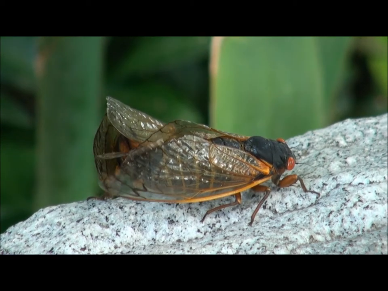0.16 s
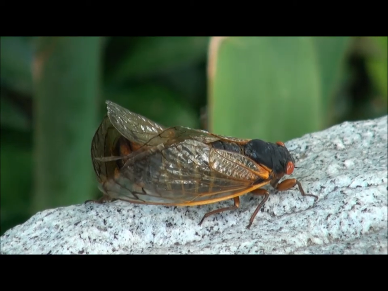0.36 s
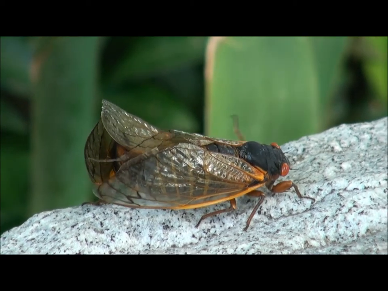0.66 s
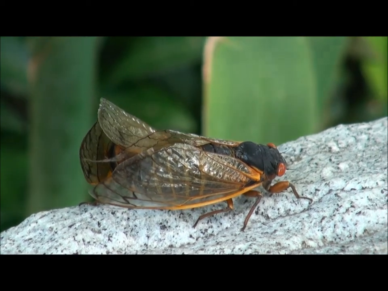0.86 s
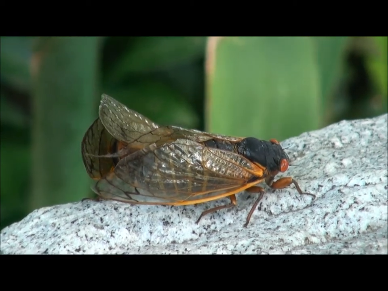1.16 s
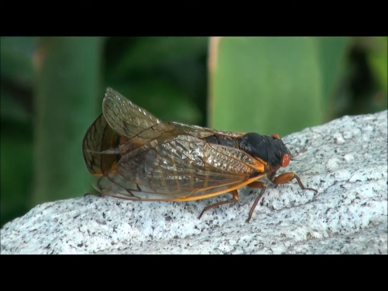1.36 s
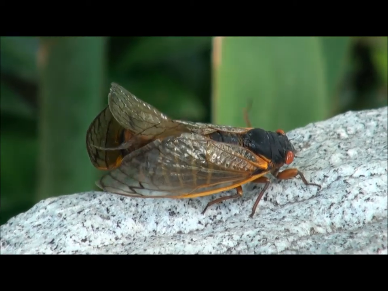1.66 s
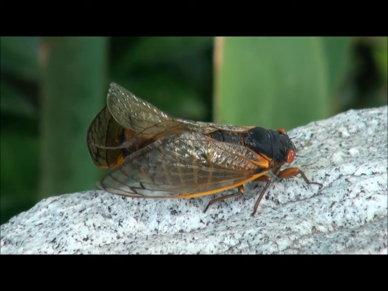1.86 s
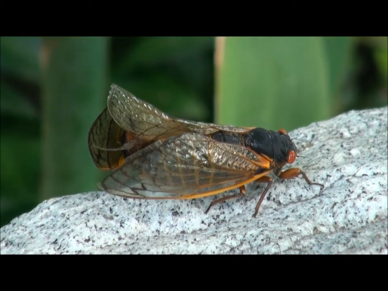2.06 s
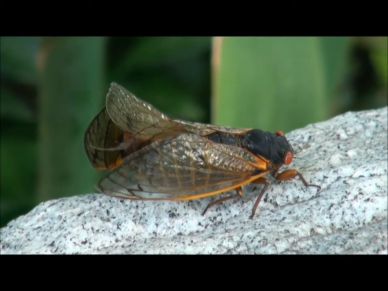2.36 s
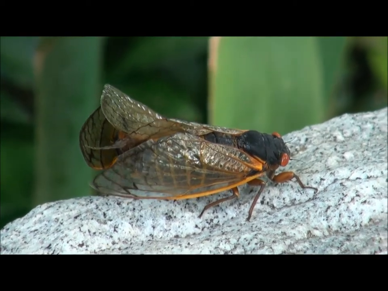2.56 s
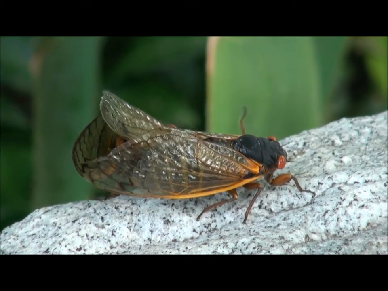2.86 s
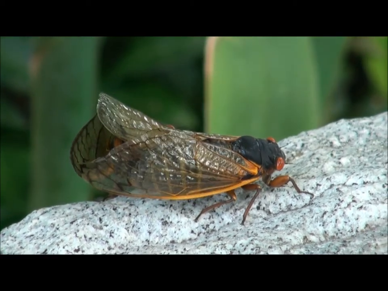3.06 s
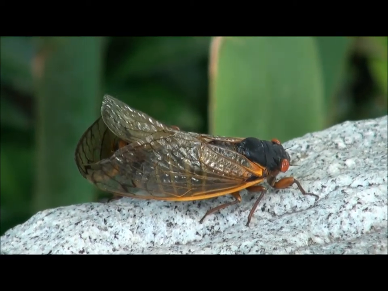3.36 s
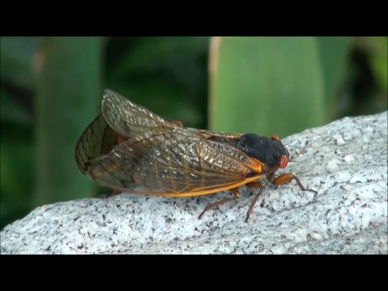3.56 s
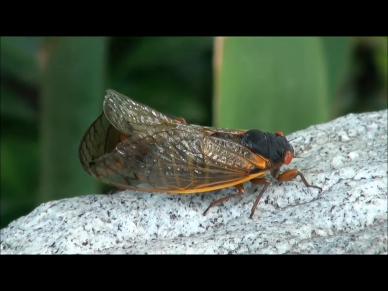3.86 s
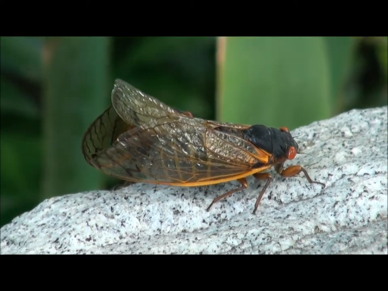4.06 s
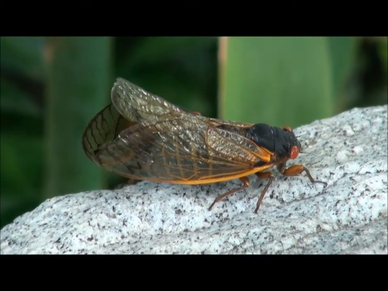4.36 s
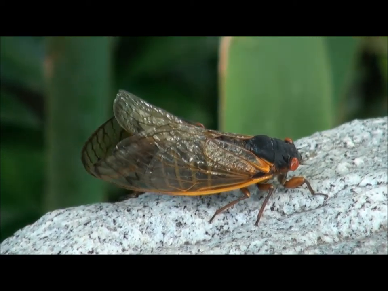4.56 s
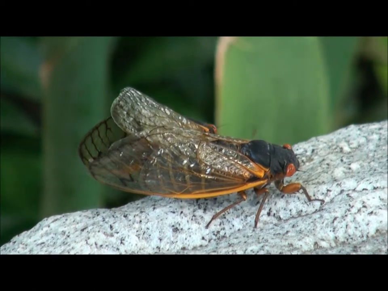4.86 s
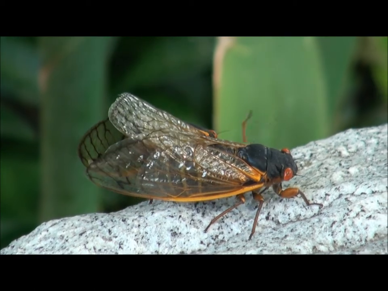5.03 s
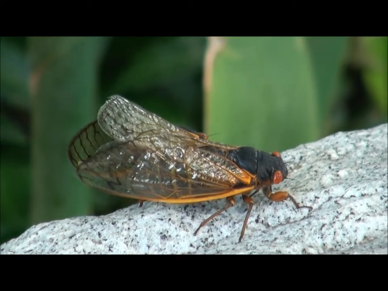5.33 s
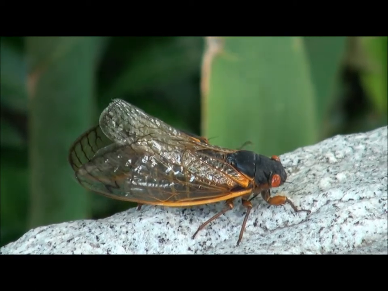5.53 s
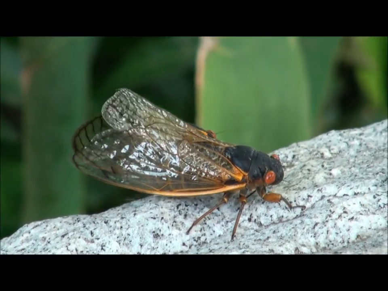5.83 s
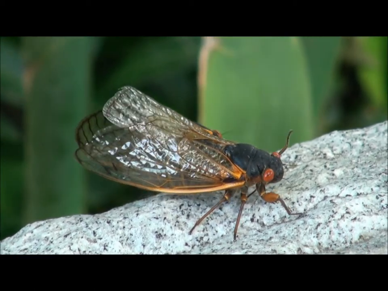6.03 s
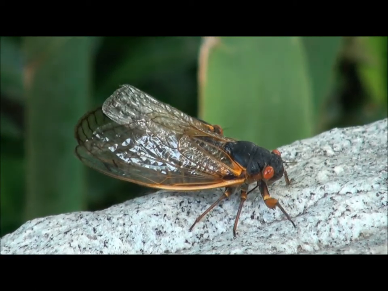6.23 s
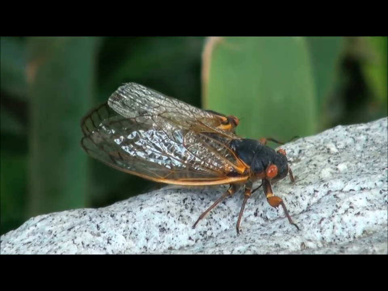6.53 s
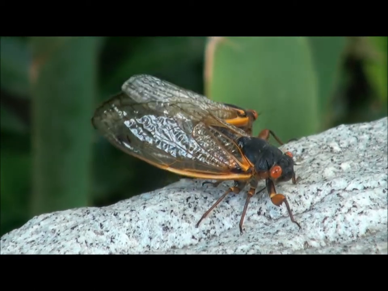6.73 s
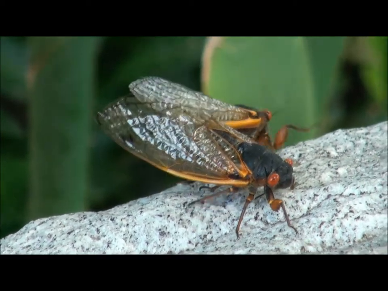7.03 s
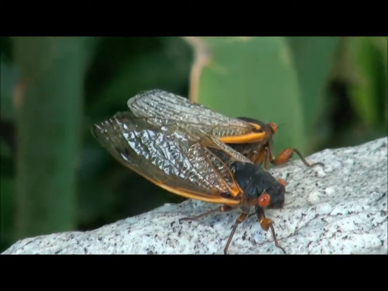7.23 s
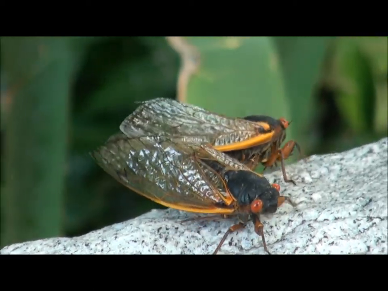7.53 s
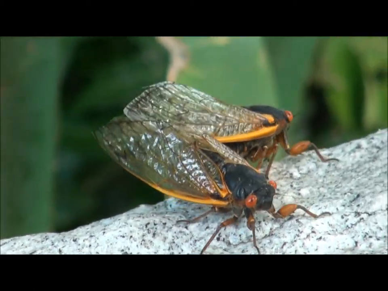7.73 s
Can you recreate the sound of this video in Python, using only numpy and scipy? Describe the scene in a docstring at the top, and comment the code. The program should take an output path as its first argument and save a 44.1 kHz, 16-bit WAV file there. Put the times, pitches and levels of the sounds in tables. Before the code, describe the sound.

Wide, natural outdoor ambience: cicadas merge into a smooth whistling hum that gently swells and eases, never stopping. Faint road rumble, tyre wash and beating engine tones sit far beneath it. A slight high rasp colours the opening and fades. Near the microphone, a single insect's stiff wings rattle for a fraction of a second a little before the middle, then only chorus and distant traffic remain.

```python
"""Periodical cicadas in chorus beside distant traffic

Forty cicadas sing wavering notes in ten trees; with a noise band for the far crowd they drone near 1.3 kHz.
A thin hiss of shaped noise stands above them and swells with the song.
Distant engines, built from drifting sines, hum and beat under a road of low rumble and tyre wash.
One cicada on a stone by the microphone flicks its wings: short bursts of filtered noise.
A faint high sine whines throughout, and a narrow band of noise rasps at the start."""
import sys
import numpy as np
from scipy import signal
from scipy.fft import rfft, irfft, next_fast_len
from scipy.io import wavfile
from scipy.ndimage import map_coordinates

SR = 44100
rng = np.random.default_rng(int(sys.argv[2]) if len(sys.argv) > 2 else 0)


def waveform_to_disk(signal):
    """Save audio, clipped to [-1, 1], as 16-bit WAV at the path in sys.argv[1]."""
    frames = np.transpose(np.atleast_2d(signal))
    scaled = np.clip(frames, -1, 1) * 32767
    samples = np.round(scaled).astype(np.int16)
    wavfile.write(sys.argv[1], SR, samples)


N = 347949
CLOCK = np.arange(N) / SR  # time of each sample [s]

# the chorus swells and eases as a whole: (time [s], level [dB])
CHORUS_LEVEL = [(0, -23.5), (0.85, -23.0), (1.6, -24.5), (2.55, -23.0), (2.85, -25.5), (3.7, -23.0),
                (5.05, -22), (6.3, -23.0), (6.8, -23.5), (7.89, -22.5)]


def amp(db):
    """Decibels to gain."""
    return 10 ** (np.asarray(db) / 20)


def unit(x):
    """Scale to rms 1."""
    return x / np.sqrt(np.mean(x ** 2) + 1e-20)


def along(points, hz):
    """Join (frequency [Hz], value) points on a log frequency axis."""
    f, v = np.transpose(points)
    return np.interp(np.log(hz + 1), np.log(f + 1), v)


def curves(rows):
    """One value per sample for each column after the time."""
    s, *columns = np.transpose(rows)
    return [np.interp(CLOCK, s, column) for column in columns]


def wobble(rate, t):
    """A smooth random curve at times t, with rate knots a second."""
    knots = rng.standard_normal(int(t[-1] * rate) + 4)
    return map_coordinates(knots, [t * rate])


def swell(t, s, rise_s, fall_s):
    """A bell-shaped gain that peaks at time s; rise and fall are standard deviations."""
    width_s = np.where(t < s, rise_s, fall_s)
    return np.exp(-.5 * ((t - s) / width_s) ** 2)


def tone(hz):
    """A sine that follows a pitch curve from a random phase."""
    cycles = np.cumsum(hz) / SR
    return np.sin(2 * np.pi * (cycles + rng.random()))


def filtered(x, response):
    """Multiply the spectrum of x by a response of frequency."""
    m = next_fast_len(N + SR // 2)
    gain = response(np.fft.rfftfreq(m, 1 / SR))
    return irfft(rfft(x, m) * gain, m)[..., :N]


def spread(pair, pan_db):
    """Two unrelated signals become a diffuse field at closely spaced microphones, rms 1."""
    # likeness of left and right: (frequency [Hz], coherence [0 to 1])
    coherence = [(30, 0.84), (80, 0.97), (180, 0.99), (330, 0.88), (700, .83), (1300, 0.83), (5000, 0.91),
                 (9000, 0.93), (11000, 0.71), (11600, .995)]

    def mid_side(hz):
        angle = np.arccos(np.clip(along(coherence, hz), -1, 1)) / 2
        return np.array([np.cos(angle), np.sin(angle)])

    mid, side = filtered(pair, mid_side)
    pan = amp([[pan_db / 2], [-pan_db / 2]])
    return unit(np.array([mid + side, mid - side]) * pan)


def rush(spectrum, pan_db):
    """Diffuse coloured noise of rms 1."""
    noise = rng.standard_normal((2, N))
    return spread(filtered(noise, lambda hz: amp(along(spectrum, hz))), pan_db)


def whine(hz=3016, level_db=-63, drift_hz=4):
    """A faint, nearly steady high sine."""
    return amp(level_db) * unit(tone(hz + drift_hz * wobble(15, CLOCK)))


def rasp(level_db=-52, loudest_s=.2, half_s=0.54):
    """A narrow, bright band of noise swells at once and dies away within two seconds."""
    # relative spectrum: (frequency [Hz], density [dB per Hz])
    spectrum = [(3000, -30), (4100, -4), (4600, 0), (5100, -10), (6000, -30)]
    return amp(level_db) * swell(CLOCK, loudest_s, half_s, half_s) * rush(spectrum, pan_db=.5)


def road(screened_s=0.11):
    """Far traffic: a low rumble and the wash of tyres; each passing vehicle adds its power to both."""
    # relative spectra: (frequency [Hz], density [dB per Hz])
    rumble_spectrum = [(20, -17), (35, -8), (53, -2.5), (66, -5), (95, -1), (150, 0.5), (200, -0.5),
                       (255, -5.5), (350, 0), (430, -7.5), (540, -14), (900, -13.5), (2000, -58)]
    tyre_spectrum = [(150, -14), (500, -0.5), (900, 4.5), (1900, -0.5), (2550, 0.5), (3200, -5),
                     (4700, -6.5), (6200, -12), (8000, -17.5), (15000, -39)]
    # vehicles that swell and are soon screened again:
    # (loudest at [s], approach [s], rumble level [dB], tyre level [dB])
    passes = [(.05, .4, -35.5, -40), (1.25, 1, -38.5, -41), (2.55, .45, -38, -43), (5.05, 0.47, -50, -43)]
    # the steady traffic slowly thins out: dB at the start, less dB per second
    rumble = amp(-37 - .55 * CLOCK)
    tyres = amp(-39 - .5 * CLOCK)
    for s, approach_s, rumble_db, tyre_db in passes:
        nearness = swell(CLOCK, s, approach_s, screened_s)
        rumble = np.hypot(rumble, amp(rumble_db) * nearness)
        tyres = np.hypot(tyres, amp(tyre_db) * nearness)
    return rumble * rush(rumble_spectrum, pan_db=1.5) + tyres * rush(tyre_spectrum, pan_db=1.0)


def far_notes(drift_hz=3, waver_db=1.5, pan_db=4.5):
    """Notes of farther engines swell and fade, unsteady in pitch and level."""
    # (loudest at [s], standard deviation of the swell [s], pitch [Hz], level before panning [dB])
    hums = [(.8, 0.99, 341.4, -43.5), (1.18, 0.78, 368, -42.5), (2.6, 1.07, 313.3, -45.5),
            (3.4, 1.95, 335.2, -48.5), (6.1, .8, 685, -52.5)]
    notes = np.zeros(N)
    for s, half_s, hz, db in hums:
        level = swell(CLOCK, s, half_s, half_s) * amp(db + waver_db * wobble(5.07, CLOCK))
        notes += level * unit(tone(hz + drift_hz * wobble(9, CLOCK)))
    return notes * amp([[pan_db / 2], [-pan_db / 2]])


def overtones(hz, orders, waver_db, drift_hz):
    """Wavering partials on multiples of a firing rate, each fading at its own pace."""
    total = np.zeros(N)
    for multiple, db, fade in orders:
        level = amp(db - fade * CLOCK + waver_db * wobble(5, CLOCK))
        total += level * unit(tone(multiple * hz + drift_hz * wobble(7, CLOCK)))
    return total


def low_engine(loudest_s=5.7, half_s=3.4, level_db=-45.5, rate_hz=70.9, sag_hz_per_s=.8):
    """A lower engine swells and eases, its firing rate sagging, and beats against the nearest one."""
    # relative to its hum: (multiple of the firing rate, level at the start [dB], fade [dB per s])
    orders = [(2, -0.5, .7)]
    firing_hz = rate_hz - sag_hz_per_s * (CLOCK - loudest_s)
    hum = unit(tone(firing_hz))
    upper = overtones(firing_hz, orders, waver_db=-0.5, drift_hz=1.15)
    return amp(level_db) * swell(CLOCK, loudest_s, half_s, half_s) * (hum + upper)


def near_engine(slowest_hz=79.27, slowest_s=2.8, throb_db=1.5, dulling_db_per_s=0.6):
    """The nearest engine eases off, then slowly gathers speed; its overtones weaken with time."""
    # loudness of the hum: (time [s], level [dB])
    hum_level = [(0, -38), (1.2, -38), (1.5, -43.5), (2.1, -39.5), (2.35, -35), (2.9, -37.0), (4.9, -38.5),
                 (6.5, -36.5), (7.89, -45)]
    # the hum dips briefly once: (time [s], standard deviation [s], depth [dB])
    dip = (0.62, 0.043, 12)
    # relative levels, before the common dulling:
    # (multiple of the firing rate, level at the start [dB], fade [dB per s])
    orders = [(2, -10, 0.36), (3, -19.5, 1), (3.5, -5.5, 1.74)]
    bend = np.where(CLOCK < slowest_s, 0.296, .235)  # slowing, then gathering speed [Hz per s squared]
    firing_hz = slowest_hz + bend * (CLOCK - slowest_s) ** 2
    level_db, = curves(hum_level)
    dip_s, half_s, depth_db = dip
    dip_db = depth_db * swell(CLOCK, dip_s, half_s, half_s)
    hum = amp(level_db + throb_db * wobble(6, CLOCK) - dip_db) * unit(tone(firing_hz))
    upper = overtones(firing_hz, orders, waver_db=2.0, drift_hz=0.77)
    upper_db = level_db.mean() - dulling_db_per_s * (CLOCK - CLOCK.mean())
    return hum + amp(upper_db) * upper


def engines():
    """Two distant engines beat against each other while other notes come and go."""
    return near_engine() + low_engine() + far_notes()


def wings(rustle_db=-57, grain_db=4, middle_s=2.96, half_s=.11, t60=.017, attack_s=.0004):
    """Stiff wings snap against each other, and rustle faintly around the snaps as they settle."""
    # (time [s], level before attack and colouring [dB])
    flicks = [(2.7403, -41), (2.7648, -30), (2.769, -30), (2.8196, -27), (2.8885, -27), (2.925, -44),
              (3.0005, -42)]
    # colour of the wing noise: (frequency [Hz], gain [dB])
    spectrum = [(2000, -30), (4500, -8), (6300, 0), (9000, -3.5), (12000, 0), (14000, -3), (15800, -9)]
    rustle = amp(rustle_db + grain_db * wobble(350, CLOCK))
    contact = rustle * swell(CLOCK, middle_s, half_s, half_s)
    t = np.arange(SR // 20) / SR
    for s, db in flicks:
        snap = amp(db - 60 * t / t60) * (1 - np.exp(-t / attack_s))
        contact[round(s * SR):][:len(t)] += snap
    return filtered(contact * rng.standard_normal(N), lambda hz: amp(along(spectrum, hz)))


def hiss(level_db=-50, follows=.4, flutter_db=0.46):
    """The ribs of all the tymbals click too densely to be told apart; the hiss swells with the song."""
    # relative spectrum: (frequency [Hz], density [dB per Hz])
    spectrum = [(2800, -30), (3400, -6), (3850, 8.5), (4500, -2), (7000, -6), (8000, 1.5), (9100, -0.5),
                (10200, -6), (11150, -9), (11450, -5.5), (13400, -11), (14800, -27), (15700, -29)]
    # the hiss drops briefly: (time [s], standard deviation [s], depth [dB])
    lulls = [(1.58, .15, 2.2), (6.72, .12, 1.2)]
    song_db, = curves(CHORUS_LEVEL)
    lull_db = sum(db * swell(CLOCK, s, half_s, half_s) for s, half_s, db in lulls)
    # follows: dB gained for each dB of the chorus
    hiss_db = level_db + follows * (song_db - song_db.mean()) - lull_db
    return amp(hiss_db + flutter_db * wobble(12, CLOCK)) * rush(spectrum, pan_db=-0.3)


def woods(x, t60):
    """Trunks and leaves scatter a sound into two unrelated tails."""
    t = np.arange(SR // 2) / SR
    tails = rng.standard_normal((2, len(t))) * amp(-60 * t / t60)
    # the trees are already ringing when the scene begins
    sounding = np.pad(x, (len(t) - 1, 0), mode="reflect")
    return signal.fftconvolve(sounding[None], tails, mode="valid", axes=1)


def singer(pitch_hz, phrase_s, start, waver, wander, droop):
    """One male holds a wavering note, lets it droop as his abdomen relaxes, rests and starts again."""
    t = np.linspace(0, N / SR, num=4000)
    stage = (t / phrase_s + start) % 1  # how far through the phrase, 0 to 1
    loud = np.interp(stage, [0, .1, .8, .9], [0, 1, 1, 0])
    sag = np.interp(stage, [.75, .9], [0, 1])
    # waver, wander and droop are fractions of the pitch
    hz = pitch_hz * (1 + waver * wobble(25, t) + wander * wobble(2, t) - droop * sag)
    pitch, level = curves(np.transpose([t, hz, loud]))
    return level * tone(pitch)


def chorus(count=40, centre_hz=1303, scatter_hz=32, near_db=-3, far_db=-1.5):
    """The nearer males sing as separate notes; the countless far ones blur into a band around them."""
    # the far crowd's relative spectrum: (frequency [Hz], density [dB per Hz])
    far_spectrum = [(450, -47.5), (680, -28.5), (860, -20.5), (1020, -21.5), (1130, -10.5), (1220, -5),
                    (1270, -4), (1320, -1.5), (1400, -8), (1540, -20), (1800, -28), (2150, -34.5),
                    (2550, -36), (3300, -59.5)]
    rank = (np.arange(count) + .5) / count
    # body size sets the pitch: most lie near the centre, a few far out
    pitches = centre_hz + scatter_hz * np.log(rank / (1 - rank)) / 2
    near = np.zeros((2, N))
    # they sit in ten trees, each heard along its own paths
    for tree in rng.permutation(pitches).reshape(10, -1):
        song = sum(singer(hz, rng.uniform(2, 3.5), rng.random(), waver=0.004988, wander=.008, droop=.12)
                   for hz in tree)
        near += woods(song, t60=0.35)
    level_db, = curves(CHORUS_LEVEL)
    voices = amp(near_db) * spread(near, pan_db=-2)
    far_crowd = amp(far_db) * rush(far_spectrum, pan_db=-0.4)
    return amp(level_db) * (voices + far_crowd)


def scene():
    """Traffic in the distance, wings close by, the chorus in the trees."""
    return whine() + rasp() + road() + engines() + wings() + hiss() + chorus()


def record(dry, top_hz=15750):
    """The recorder keeps nothing from its band limit upward."""
    return filtered(dry, lambda hz: hz < top_hz)


dry = scene()
out = record(dry)
waveform_to_disk(out)
```